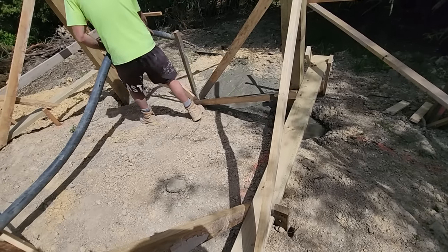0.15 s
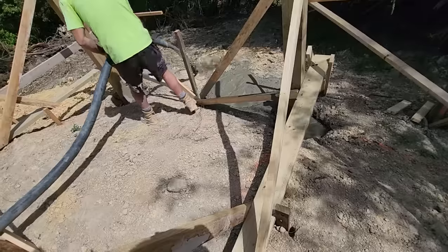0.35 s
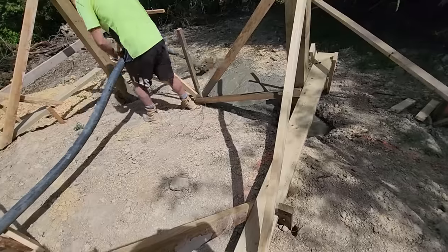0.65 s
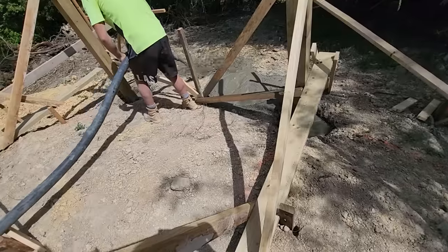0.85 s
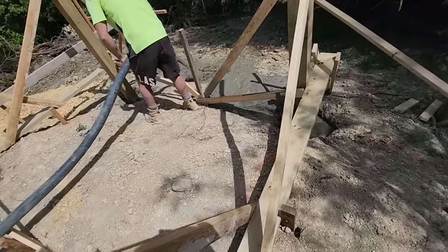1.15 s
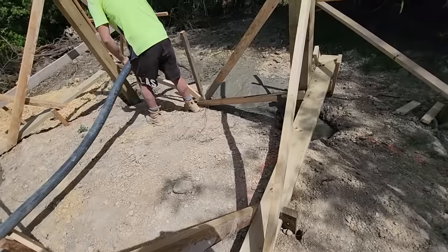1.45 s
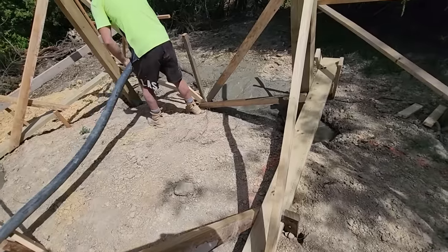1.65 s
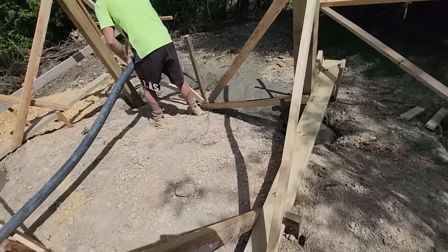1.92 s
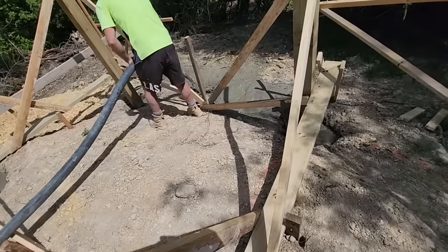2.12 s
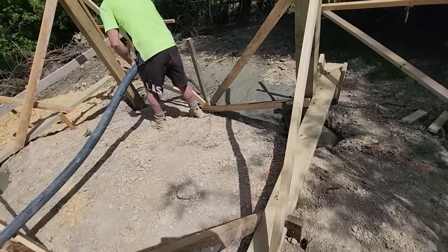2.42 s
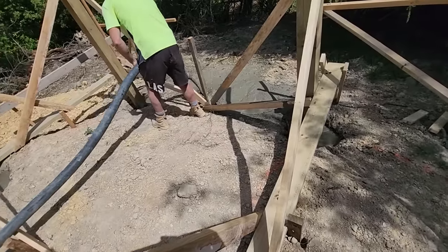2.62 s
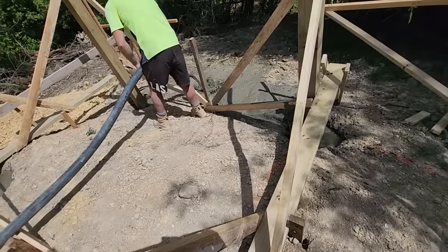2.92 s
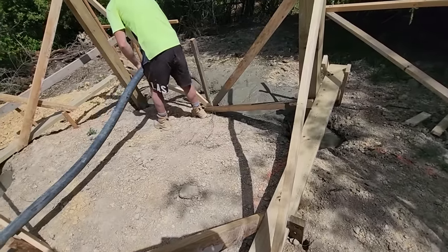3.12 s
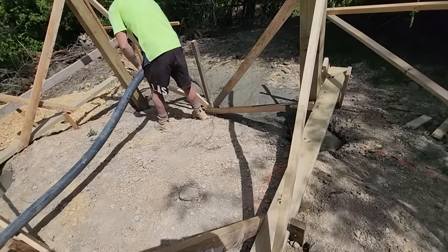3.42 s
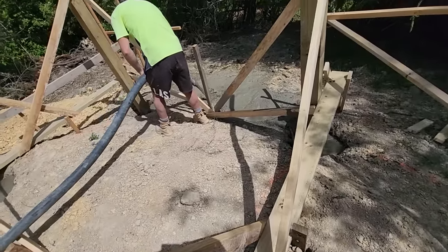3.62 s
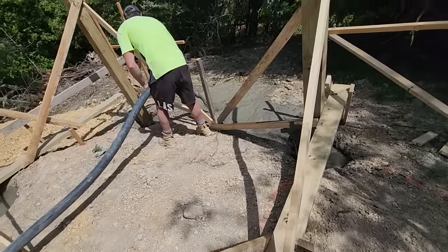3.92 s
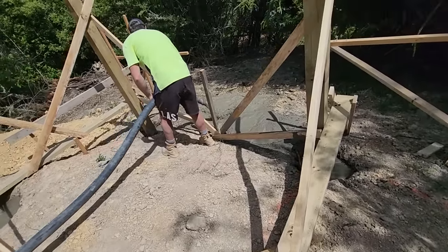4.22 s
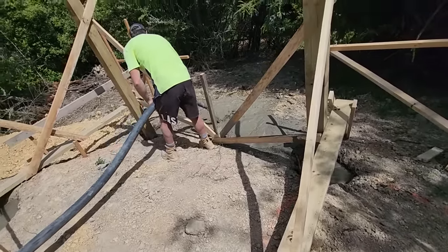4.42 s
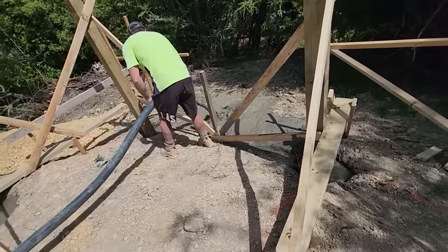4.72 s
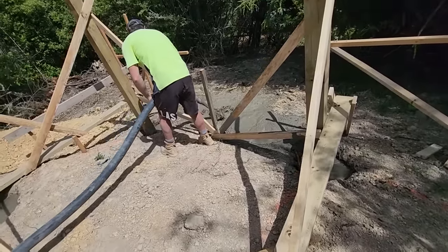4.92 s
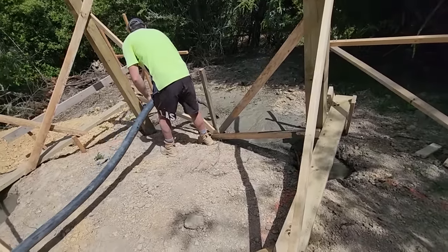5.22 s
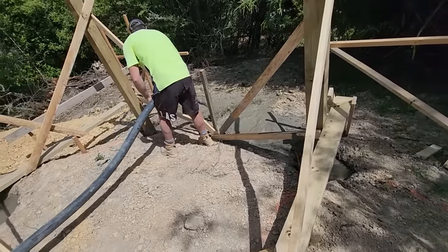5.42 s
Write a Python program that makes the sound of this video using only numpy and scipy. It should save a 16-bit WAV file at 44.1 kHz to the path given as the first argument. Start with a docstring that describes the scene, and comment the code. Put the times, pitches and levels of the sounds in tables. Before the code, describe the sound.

Wet concrete slides from a hose close to the microphone at an outdoor building site, making a continuous sandy hiss with crackling, ticking gravel. Some way off, a pump engine drones throughout with a low, slightly uneven throb and faint mechanical noise. The first second is busiest: stones clack and wet splats land in quick clusters, with the sharpest slap at about 0.7 seconds, followed by a few small plops. Around 2.2 seconds an air pocket escapes with a hollow glug and faint bubbles. From there until about 4.7 seconds the stream is thinner, with soft lumps slopping into the footing, brief spatters and single stone knocks. Short spurts of air come near 3.1, 4 and 4.6 seconds. The flow then strengthens again, with a splat at 5.2 seconds and a few stone clacks around 5.5. Light air rumbles faintly underneath.

```python
"""Outdoor building site. Close by, the last wet concrete slides out of a hose: sandy slurry hisses, gravel
crackles, stones clack, air pockets ring and glug, and splats and soft lumps land in the footing.
Some way off the pump's engine drones and lopes, with mechanical din, fan hum and a hydraulic whine.
Timber and ground scatter the sound to two close microphones; light air rumbles on both."""
import sys
import numpy as np
from scipy import signal
from scipy.fft import rfft, irfft, next_fast_len
from scipy.io import wavfile

SR = 44100
rng = np.random.default_rng(int(sys.argv[2]) if len(sys.argv) > 2 else 0)


def to_wav(s):
    """Save 16-bit WAV."""
    ch = np.atleast_2d(s).T  # columns
    pcm = np.round(np.clip(ch, -1, 1) * 32767)  # PCM
    wavfile.write(sys.argv[1], SR, pcm.astype(np.int16))


N = 245195
TIME = np.arange(N) / SR
FIRING_HZ, WANDER = 68.03, 0.00894  # governed rate; relative drift of engine and fan

# stream leaving the hose: t/s, hiss/dB, crackle/dB
FLOW = [(0.0, -46.5, -47), (0.08, -49, -44.5), (0.13, -50, -51), (0.29, -49.5, -43.5), (0.37, -45, -43),
        (0.6, -45, -42.5), (0.84, -45.5, -37), (0.99, -46, -44), (1.12, -46.5, -48), (1.45, -46, -43),
        (1.75, -47.5, -47.5), (2.09, -46.5, -45), (2.66, -52, -47), (3.0, -47, -44.5), (3.3, -50, -48),
        (3.98, -52.5, -48), (4.35, -50.5, -46), (4.7, -53.5, -47.5), (4.82, -48.5, -40.5),
        (5.15, -45.5, -43), (5.38, -46.5, -42.5), (5.56, -49, -40.5)]


def hiss(gain_db=0.67, tick_db=-4, tick_s=0.003):
    """Sandy slurry slides out of the hose, with narrow resonances, ticks and sharp flicks of sand."""
    spectrum = [(800, -32), (2500, 7.5), (4400, 7.5), (5500, 4), (6900, 4), (7400, 5.5), (8400, 5.5),
                (9200, 4), (10000, 2), (11200, 0.5), (11600, 6.5), (12000, 0.5), (13700, 6.5),
                (14500, -1.5), (16000, 5)]  # f/Hz, level/dB
    modes = [(3690, 0, 11), (6480, -2, 15), (7380, -1, 24), (11630, -7.5, 40)]  # resonances: f/Hz, level/dB, Q
    sizzle_level = [(0, -17), (2.6, -26), (3.3, -12), (5.1, -13), (5.56, -14)]  # stronger as the hose empties: t/s, level/dB re hiss
    flicks = [(0.099, -42), (0.121, -42), (0.141, -44), (0.225, -44), (0.259, -34), (0.397, -44),
              (0.427, -41), (0.899, -39), (1.545, -35), (1.794, -40), (2.115, -46), (2.885, -37),
              (3.515, -36), (4.032, -41), (4.61, -45), (5.287, -45), (5.379, -34.5)]  # t/s, level/dB
    flow_db, _ = curves(FLOW)
    swell_db, _ = spurts()
    mid, side = (colour(grains(per_s=14000, spread_db=2), spectrum) for _ in range(2))
    sizzle = sum(undb(db) * noise_band(hz, q) for hz, db, q in modes)
    mid = mid + undb(curves(sizzle_level)[0]) * sizzle
    impacts = np.abs(grains(per_s=65, spread_db=1.7))
    bursts = signal.lfilter([1], [1, -np.exp(-1 / (tick_s * SR))], impacts)
    ticks = undb(tick_db) * colour(bursts * rng.standard_normal((2, N)), spectrum)
    stream = undb(flow_db + swell_db + gain_db + walk(72)) * (spread(mid, side, width=1.23) + ticks)
    flick_gain = sum(undb(db) * envelope(t, t, attack_s=0.001, release_s=0.01) for t, db in flicks)
    return stream + flick_gain * colour(rng.standard_normal((2, N)), spectrum)


def crackle(gain_db=-2, flutter_db=1.26, wash_db=-7, pop_db=-4.5):
    """Gravel rattles and air pockets burst in the stream; the footing returns a diffuse wash."""
    spectrum = [(300, -27.5), (600, 0), (1000, -8), (1400, 1), (1850, 3), (2130, 6), (2400, -0.5),
                (2650, 0.5), (3000, -8), (4500, -15.5), (9000, -20.5)]  # f/Hz, level/dB
    _, flow_db = curves(FLOW)
    rattle = grains(per_s=3500, spread_db=-1)
    pops = undb(pop_db) * grains(per_s=110, spread_db=-3.5)
    direct = mic_pair(colour(rattle + pops, spectrum), pan_db=-4.5)
    wash = spread(*colour(rng.standard_normal((2, N)), spectrum))
    return undb(flow_db + spurts() + gain_db + flutter_db * walk(27)) * (direct + undb(wash_db) * wash)


def spurts(attack_s=0.0074, release_s=0.021):
    """Air in the hose swells the stream; two curves in dB."""
    events = [(0.088, 0.22, 5.5, 5), (0.419, 0.012, 3.5, -3), (0.655, 0.036, 5.5, 9),
              (0.692, 0.052, 5.5, 4.5), (0.88, 0.11, 1, 2.5), (1.211, 0.15, 0.5, 5), (1.821, 0.048, 3, 7.5),
              (3.135, 0.032, 3, 7), (4.028, 0.018, 3, 8), (4.601, 0.055, 7, 6.5), (4.836, 0.05, 1, 3),
              (5.452, .04, 3.5, 6)]  # t/s, length/s, hiss and left crackle/dB, right crackle/dB
    return sum(np.outer(db, envelope(t, t + length_s, attack_s, release_s))
               for t, length_s, *db in events)


def splats(spray=0.03, spray_t60_s=0.078, q=0.85):
    """Wet concrete hits: one sharp slap, then a spray of fine droplets."""
    events = [(0.276, -22.5, 1100), (0.29, -17.5, 1490), (0.4265, -18, 1610), (0.43, -20, 1200),
              (0.5, -24.5, 900), (0.647, -21, 1800), (0.654, -19.5, 2000), (0.662, -19, 2040),
              (0.698, -18, 1750), (0.7022, -7.5, 1190), (0.708, -20, 1050), (0.718, -15, 1740),
              (0.726, -19, 2470), (0.814, -22.5, 1860), (0.894, -31, 1190), (0.946, -24, 2080),
              (0.977, -25, 2200), (0.988, -24, 1500), (1.248, -28, 1930), (5.204, -26, 1390)]  # t/s, peak/dB, centre f/Hz
    spectrum = [(200, -5), (600, 7), (1000, 9.5), (1800, 10), (2300, 13), (2600, 8.5), (2900, -3.5),
                (5000, 7.5), (14000, 21)]  # f/Hz, level/dB
    out = np.zeros((2, N))
    age = TIME[:SR // 4]
    for t, db, hz in events:
        force = spray * grains(per_s=2400, spread_db=0, size=len(age)) * decay(age, spray_t60_s)
        force[0] = 1  # the slap
        blow = timber(force, echo_db=-7, t60_s=0.054)
        slap = colour(resonate(resonate(blow, hz, q), hz, q), spectrum)
        add_at(out, t, undb(db) * unit_peak(slap))
    return out


def stones(gravel_per_s=38, gravel_hz=2070, spread_oct=0.24, gravel_db=9.5):
    """Single stones clack; gravel ticks at random, louder in a strong stream."""
    events = [(0.1, -17.5, 3120), (0.149, -23, 2750), (0.207, -28, 1180), (0.218, -25, 1990),
              (0.239, -22.5, 1900), (0.248, -29, 2500), (0.26, -27, 1050), (0.275, -21, 1150),
              (0.291, -24, 1900), (0.307, -23, 2100), (0.333, -20.5, 2170), (0.413, -30, 1890),
              (0.428, -14.5, 1510), (0.436, -15, 2020), (0.753, -22, 2620), (0.78, -18.5, 2000),
              (0.82, -22, 2200), (0.865, -23, 2100), (0.88, -26, 2200), (0.891, -18, 2770),
              (0.936, -19, 1350), (0.943, -15, 1900), (1.321, -27, 1860), (1.829, -35, 2140),
              (1.848, -23, 2520), (2.475, -27, 2120), (2.555, -26, 2000), (2.773, -33, 2260),
              (3.002, -23, 2030), (3.885, -28, 1300), (4.017, -31, 1700), (4.041, -18, 2100),
              (4.558, -29, 3700), (4.615, -28, 2270), (4.623, -22, 2050), (4.648, -26, 2600),
              (5.474, -20, 2640), (5.487, -19, 2320), (5.49, -22, 3220)]  # t/s, peak/dB, f/Hz
    _, flow_db = curves(FLOW)
    gravel = []
    for i in np.flatnonzero(rng.random(N) < gravel_per_s / SR):
        db = flow_db[i] + gravel_db + rng.uniform(-1.7, 1)
        hz = gravel_hz * 2 ** (spread_oct * rng.standard_normal())
        gravel.append((TIME[i], db, hz))
    out = np.zeros((2, N))
    for t, db, hz in list(events) + gravel:
        add_at(out, t, undb(db) * clack(hz))
    return out


def clack(hz, crack_db=-9, crack_t60_s=0.005):
    """One stone's knock: a dry crack and a ring damped by the wet mix."""
    modes = [(.72, -24, 0.0093), (1, -3, 0.0062), (1.3, -10.5, 0.0037), (2.3, -10, .005)]  # f/pitch, level/dB, t60/s
    age = TIME[:SR // 16]
    ring = sum(undb(db) * np.sin(2 * np.pi * k * hz * age) * decay(age, t60_s) for k, db, t60_s in modes)
    crack = undb(crack_db) * rng.standard_normal(len(age)) * decay(age, crack_t60_s)
    echo = timber(signal.unit_impulse(len(age)), echo_db=-8, t60_s=0.04)
    return unit_peak(signal.fftconvolve(echo, (ring + crack)[None])[:, :len(age)])


def lumps(gain_db=-12, gulp_db=-6):
    """Soft heaps slump into the footing: dull slop, hollow gulp of trapped air, splash."""
    events = [(0.228, -31.5, 1120, -2), (0.424, -28.5, 1300, -25), (0.684, -30, 610, 4),
              (0.933, -29.5, 1420, -3), (1.389, -33.5, 754, -2), (2.153, -28, 684, -2),
              (2.219, -35, 700, -6), (2.329, -34, 990, -0.5), (2.543, -28, 1420, -4.5),
              (2.718, -32, 930, -2.5), (3.14, -28, 1000, -5), (3.17, -34, 950, -2.5),
              (3.489, -33.5, 1040, -2.5), (3.619, -35, 596, 0.5), (3.683, -27.5, 1250, -5),
              (3.868, -30.5, 1330, -7), (4.251, -31, 1390, 1.5), (4.453, -33.5, 577, 0.5),
              (4.85, -29.5, 990, -1), (5.181, -33.5, 610, 3), (5.401, -29, 795, -4), (5.469, -34, 665, 6)]  # t/s, level/dB, gulp f/Hz, splash/dB re slop
    slop_spectrum = [(120, -6.5), (250, 13.5), (420, 0.5), (650, 6.5), (1000, 6), (1400, -2.5), (2300, -17),
                     (5000, -17), (12000, -38)]  # f/Hz, level/dB
    splash_spectrum = [(600, -30.5), (1500, 15), (2200, 14.5), (3400, 11), (4500, 7), (7000, -8),
                       (15000, -12)]  # f/Hz, level/dB
    out = np.zeros((2, N))
    shape = pulse(TIME[:SR // 2], rise_s=0.00049, t60_s=0.52)
    for t, db, hz, splash_db in events:
        slop = colour(grains(per_s=3300, spread_db=1, size=(2, len(shape))), slop_spectrum)
        gulp = unit(resonate(rng.standard_normal(slop.shape), hz, q=10))
        splash = colour(rng.standard_normal(slop.shape), splash_spectrum)
        mid, side = (slop + undb(gulp_db) * gulp + undb(splash_db) * splash) * shape
        add_at(out, t, undb(db + gain_db) * spread(mid, side, width=1.1))
    return out * undb(walk(43))  # 1 dB flutter


def plops(t60_s=0.022, mud_db=-1):
    """A dollop's cavity closes on landing: the pitch shoots up and dies in a dull smack of mud."""
    events = [(0.704, -26, 400), (0.974, -32.5, 497), (1.21, -33.5, 513), (1.242, -35.5, 536),
              (1.261, -39.5, 950)]  # t/s, level/dB, start f/Hz
    out = np.zeros(N)
    age = TIME[:SR // 16]
    shape = pulse(age, rise_s=0.002, t60_s=t60_s)
    for t, db, hz in events:
        cavity = rising_sine(age, hz, t60_s, glide=0.93)
        mud = undb(mud_db) * noise_band(hz, q=1.06, size=len(age))
        add_at(out, t, undb(db) * (cavity + mud) * shape)
    return mic_pair(out, pan_db=4)


def bubbles(ring_cycles=48):
    """Air pockets open with a frothy, slightly rising ring; small ones die sooner."""
    events = [(0.707, -38, 520), (2.017, -39.5, 866), (2.164, -39, 1040), (2.172, -37, 660)]  # t/s, level/dB, f/Hz
    out = np.zeros(N)
    for t, db, hz in events:
        t60_s = ring_cycles / hz
        age = TIME[:int(2 * t60_s * SR)]
        ring = rising_sine(age, hz, t60_s, glide=0.052)
        froth = unit(resonate(rng.standard_normal(len(age)), hz, q=4))
        add_at(out, t, undb(db) * (ring + froth / 2) * decay(age, t60_s))
    return mic_pair(out, pan_db=5)


def glug(gain_db=-44.5):
    """A big air pocket escapes and sets the hollow in the hose ringing."""
    modes = [(120, 7, 49), (188, 10, 33), (340, -5.5, 26), (677, -4, 60), (800, -9, 60)]  # f/Hz, level/dB, half-width per filter stage/Hz
    air = sum(undb(db) * noise_band(hz, q=hz / half_hz / 2) for hz, db, half_hz in modes)
    shape = envelope(start_s=2.155, end_s=2.21, attack_s=0.011, release_s=0.08)
    return mic_pair(undb(gain_db) * shape * air, pan_db=1.5)


def spatters(attack_s=0.004, hold_s=0.02, release_s=0.015):
    """Thin slurry spatters off the boards in short, bright showers."""
    events = [(2.155, -49), (2.55, -43), (2.72, -45.5), (3.15, -47), (5.2, -45), (5.405, -46)]  # t/s, level/dB
    spectrum = [(1500, -9), (2600, -14), (3050, 2), (3280, 0), (3520, 7), (3850, -18), (8000, -44)]  # f/Hz, level/dB
    showers = sum(undb(db) * envelope(t, t + hold_s, attack_s, release_s) for t, db in events)
    return mic_pair(showers * colour(grains(per_s=2600, spread_db=3.5), spectrum), pan_db=-2)


def engine(throb_db=0.4, chug_db=-40, uneven_db=1.1, puff_depth=0.8):
    """Firing tone, exhaust overtones, lope of uneven cylinders and gas puffs through the silencer."""
    effort = [(0.0, -32), (0.08, -30), (2.97, -31), (3.31, -28), (3.38, -30), (4.18, -29.5), (4.41, -34),
              (5.16, -30), (5.54, -31.5), (5.56, -32)]  # firing tone: t/s, level/dB
    octave = [(0.0, -51), (0.04, -41.5), (1.35, -41), (1.41, -50), (1.59, -35), (2.11, -37.5),
              (2.31, -33.5), (2.46, -43), (2.52, -35), (2.94, -32), (3.03, -42), (3.31, -33), (3.36, -43.5),
              (3.62, -33.5), (3.85, -41.5), (4.21, -30.5), (4.74, -44), (4.88, -35), (4.92, -49.5),
              (5.23, -33.5), (5.36, -51), (5.56, -47)]  # order 2, swelling with each pump stroke: t/s, level/dB
    upper_orders = [(3, -47), (4, -60)]  # order, level/dB
    half_orders = [(0.0, -44, -57), (0.04, -38, -45.5), (0.23, -39, -44), (1.01, -38, -51), (1.1, -49, -55),
                   (1.49, -38, -45.5), (1.59, -55, -45), (1.7, -39, -48), (2.11, -54, -52),
                   (2.26, -32, -35.5), (2.51, -38.5, -46.5), (3.1, -40.5, -37), (3.56, -50, -53),
                   (3.79, -38.5, -36.5), (3.89, -42, -53), (3.95, -31, -37), (4.09, -42, -40.5),
                   (5.2, -46, -50), (5.28, -61, -44.5), (5.56, -36, -43)]  # t/s, order 1.5/dB, order 2.5/dB
    silencer = [(25, -27), (50, -7.5), (70, -0.5), (100, 0.5), (125, 0), (170, -1.5), (215, -2), (250, -11),
                (285, -11.5), (330, -14), (420, -23), (900, -65), (3000, -110)]  # silencer and distance: f/Hz, level/dB
    firing_db, = curves(effort)
    octave_db, = curves(octave)
    low_db, high_db = curves(half_orders)
    phase = drifting_phase(FIRING_HZ, drift_hz=4.9)
    tone = undb(firing_db + throb_db * walk(25)) * np.sqrt(2) * np.cos(phase)
    exhaust = overtones(phase, [(2, octave_db - 0.5)], waver=0.15, slip_rad=0.25)
    exhaust += overtones(phase, upper_orders, waver=0.33)
    lope = overtones(phase, [(1.5, low_db - 2), (2.5, high_db - 0.5)], waver=0.3)
    puffs = colour(rng.standard_normal(N) * (1 + puff_depth * np.cos(phase)), silencer)
    return tone + exhaust + lope + undb(chug_db + uneven_db * walk(19)) * puffs


def overtones(phase, orders, waver, slip_rad=0.99, stumble=0.22):
    """Engine orders drift in strength and phase and stumble from firing to firing."""
    out = 0
    for k, db in orders:
        drift = waver * (walk(14) + 1j * walk(26))
        drift += stumble * (walk(FIRING_HZ / 2) + 1j * walk(FIRING_HZ / 2))
        carrier = np.exp(1j * (k * phase + slip_rad * walk(1.75)))
        out = out + undb(db) * unit(np.real((1 + drift) * carrier))
    return out


def machinery(waver_db=0.5, whine_db=-60.5, fan_db=-59.5):
    """The pump's distant mechanical din, a thin hydraulic whine under load and fan hum."""
    spectrum = [(25, -24), (100, -28), (280, -12), (400, -25), (600, -11.5), (900, -12), (1200, -18.5),
                (2000, -18.5), (4000, -23), (12000, -33.5)]  # f/Hz, level/dB
    din = [(0, -46.5), (1.1, -49.5), (2.05, -53), (2.6, -49), (3.4, -48.5), (4.1, -48), (5.56, -51)]  # t/s, level/dB
    mid, side = colour(rng.standard_normal((2, N)), spectrum) * undb(curves(din)[0] + waver_db * walk(1.2))
    load = envelope(start_s=2.9, end_s=5, attack_s=0.2, release_s=0.2)
    whine = undb(whine_db) * load * unit(resonate(rng.standard_normal(N), hz=470, q=40))
    fan = undb(fan_db) * np.sqrt(2) * np.cos(drifting_phase(hz=283.2, drift_hz=3))
    return spread(mid, side) + whine + fan


def breeze(level_db=-52, gust_db=0.5):
    """Light air rumbles on each microphone separately."""
    spectrum = [(20, 5), (60, -4), (140, 0.5), (250, -9), (500, -16.5), (2000, -80)]  # f/Hz, level/dB
    return undb(level_db + gust_db * walk(2.7)) * colour(rng.standard_normal((2, N)), spectrum)


def timber(force, echo_db, t60_s):
    """A direct blow plus its short scatter off the timber."""
    scatter = rng.standard_normal((2, len(force))) * decay(TIME[:len(force)], t60_s)
    return mic_pair(force) + scatter * undb(echo_db) * np.linalg.norm(force) / np.linalg.norm(scatter[0])


def ground(x, share=0.22, delay_s=0.002222, corner_hz=5000):
    """Direct sound plus a slightly dulled ground bounce."""
    hz = np.arange(N // 2 + 1) * SR / N
    bounce = share * np.exp(-2j * np.pi * hz * delay_s) / np.hypot(1, hz / corner_hz)
    return irfft(rfft(x) * (1 + bounce), N)


def mic_pair(x, pan_db=-3, lag_samples=3):
    """Direct sound reaches the left microphone first; pan_db is left over right."""
    late = np.pad(x, (lag_samples, 0))[:len(x)]
    return np.array([x, late]) * undb(np.array([[pan_db], [-pan_db]]) / 2)


def spread(mid, side, width=1, corner_hz=880):
    """Diffuse sound: close microphones agree on long waves and differ on short ones."""
    opposed = signal.lfilter(*signal.butter(1, corner_hz, "high", fs=SR), side)
    return mid + width * opposed * np.array([[1], [-1]])


def grains(per_s, spread_db, size=N):
    """Random clicks, a few much larger (smaller if spread_db < 0); rms 1."""
    sizes = undb(spread_db * np.minimum(rng.exponential(size=size), 5))
    return unit((rng.random(size) < per_s / SR) * sizes * rng.choice([-1, 1], size))


def colour(x, points):
    """Minimum-phase filter through (f/Hz, level/dB) points; rms 1."""
    length = x.shape[-1]
    size = 2 * next_fast_len(length // 2 + SR // 10, True)
    hz, db = np.transpose(points)
    bin_hz = np.arange(size // 2 + 1) * SR / size
    cepstrum = irfft(np.log(undb(np.interp(np.log(bin_hz + 1), np.log(hz), db))))
    cepstrum[1:size // 2] *= 2
    cepstrum[size // 2 + 1:] = 0
    return unit(irfft(rfft(x, size) * np.exp(rfft(cepstrum)), size)[..., :length])


def resonate(x, hz, q):
    """One resonance, capped at SR / 4."""
    return signal.lfilter(*signal.iirpeak(min(hz, SR / 4), q, fs=SR), x)


def noise_band(hz, q, size=N):
    """Noise through the same resonance twice; rms 1."""
    return unit(resonate(resonate(rng.standard_normal(size), hz, q), hz, q))


def rising_sine(age, hz, t60_s, glide):
    """Pitch rises by the fraction glide per t60_s."""
    return np.sin(2 * np.pi * hz * age * (1 + glide * age / t60_s / 2))


def drifting_phase(hz, drift_hz):
    """Phase in rad of a slightly wandering rotation."""
    return 2 * np.pi * np.cumsum(hz * (1 + WANDER * walk(drift_hz))) / SR


def walk(rate_hz):
    """Smooth random curve; rms 1."""
    hz = np.arange(N // 2 + 1) * SR / N
    return unit(irfft(rfft(rng.standard_normal(N)) * np.exp(-(2 * hz / rate_hz) ** 2), N))


def curves(table):
    """Table columns, linearly interpolated in time."""
    t, *columns = np.transpose(table)
    return [np.interp(TIME, t, column) for column in columns]


def envelope(start_s, end_s, attack_s, release_s):
    """Linear rise from start_s, exponential release from end_s."""
    return np.clip((TIME - start_s) / attack_s, 0, 1) * np.exp(-np.maximum(TIME - end_s, 0) / release_s)


def pulse(age, rise_s, t60_s):
    """Quick rise and decay; peak 1."""
    shape = (1 - np.exp(-age / rise_s)) * decay(age, t60_s)
    return shape / shape.max()


def decay(age, t60_s):
    """Falls 60 dB in t60_s."""
    return np.exp(-np.log(1000) * age / t60_s)


def add_at(out, start_s, x):
    """Mix x into out, cut at the end."""
    first = int(start_s * SR)
    out[..., first:first + x.shape[-1]] += x[..., :N - first]


def undb(db):
    """Decibels to gain."""
    return 10 ** (np.asarray(db) / 20)


def unit(x):
    """Scale to rms 1."""
    return x / np.sqrt(np.mean(x ** 2))


def unit_peak(x):
    """Scale so the channel mean peaks at 1."""
    return x / np.abs(x.mean(axis=0)).max()


def scene():
    """The far pump in the middle, the concrete work around it."""
    pump = mic_pair(engine(), pan_db=0) + machinery()
    pour = ground(hiss() + crackle() + lumps() + splats())
    return pump + pour + stones() + plops() + bubbles() + glug() + spatters() + breeze()


def record(dry):
    """Steep low-pass at 15850 Hz."""
    return signal.sosfilt(signal.ellip(10, 0.1, 80, 15850, fs=SR, output="sos"), dry)


dry = scene()
out = record(dry)
to_wav(out)
```